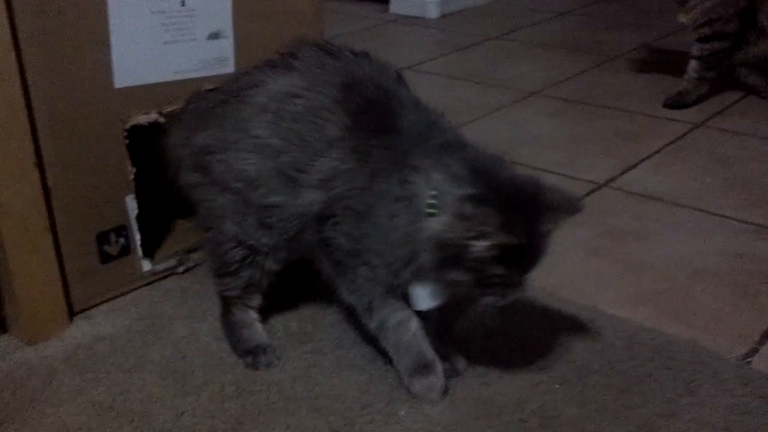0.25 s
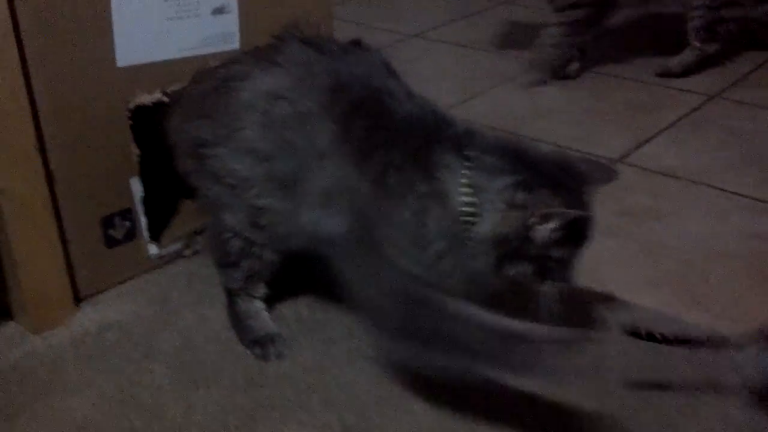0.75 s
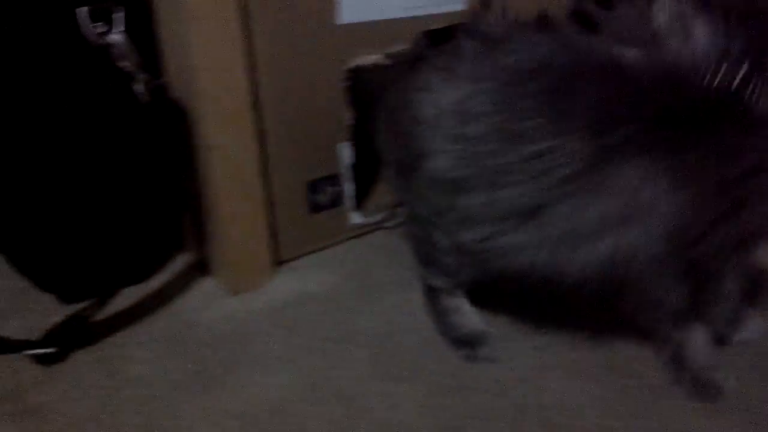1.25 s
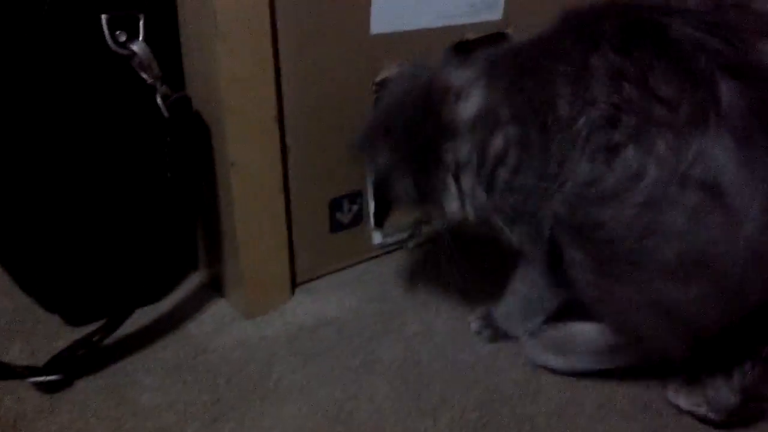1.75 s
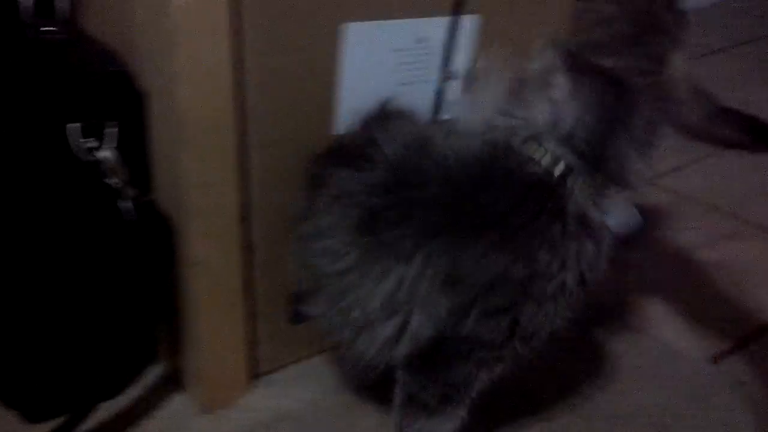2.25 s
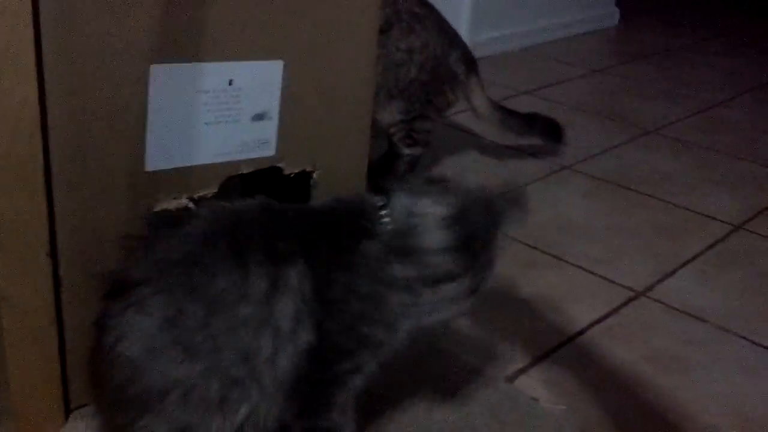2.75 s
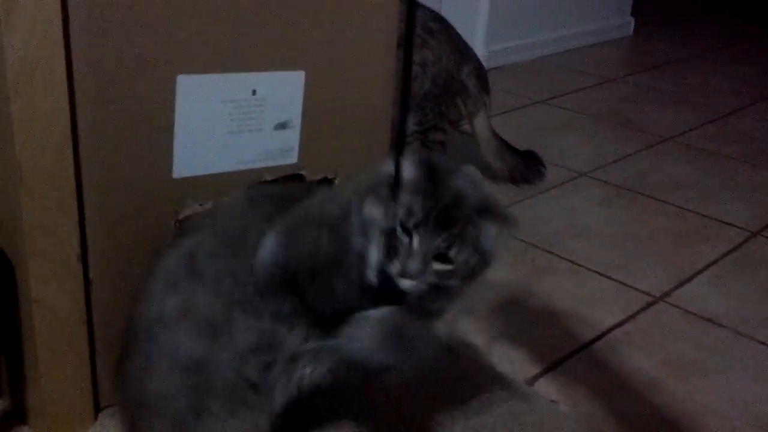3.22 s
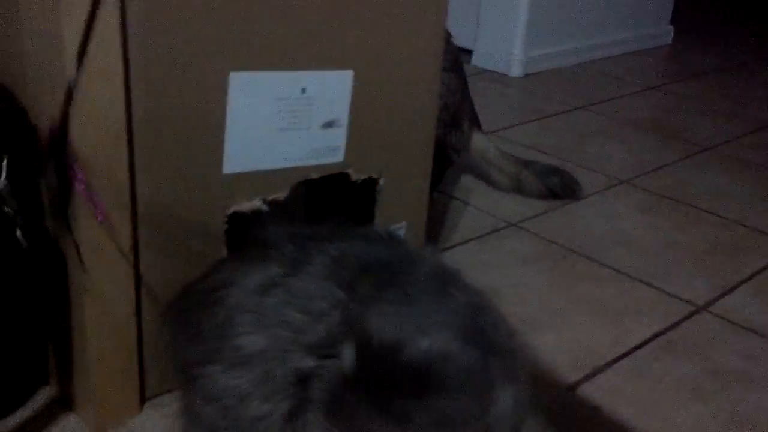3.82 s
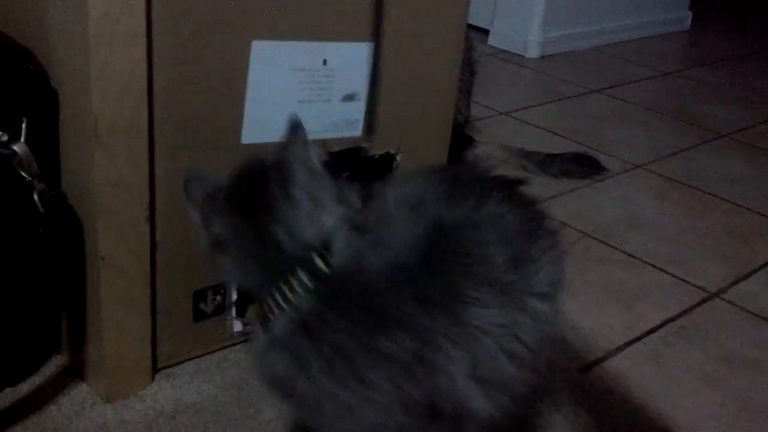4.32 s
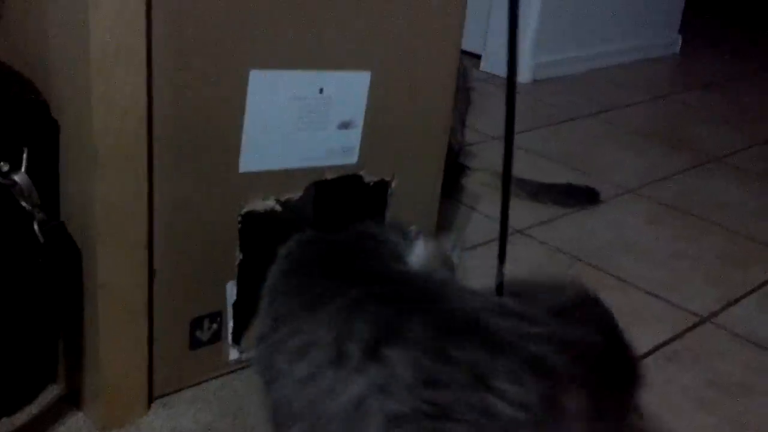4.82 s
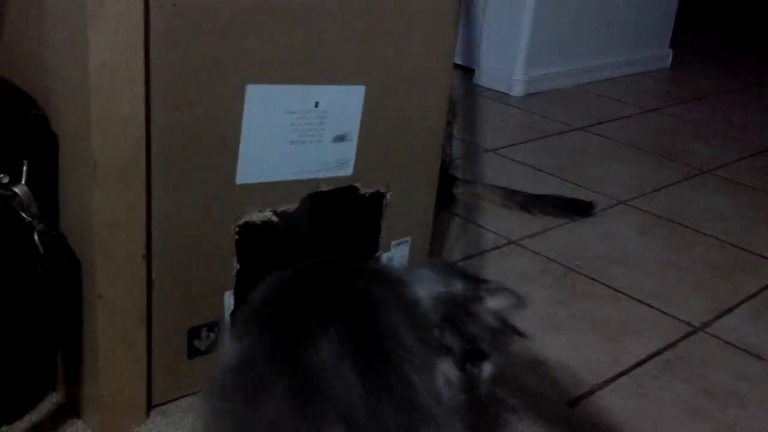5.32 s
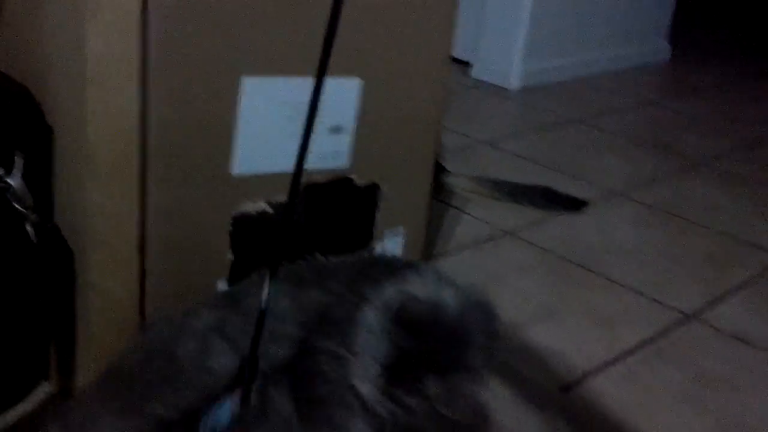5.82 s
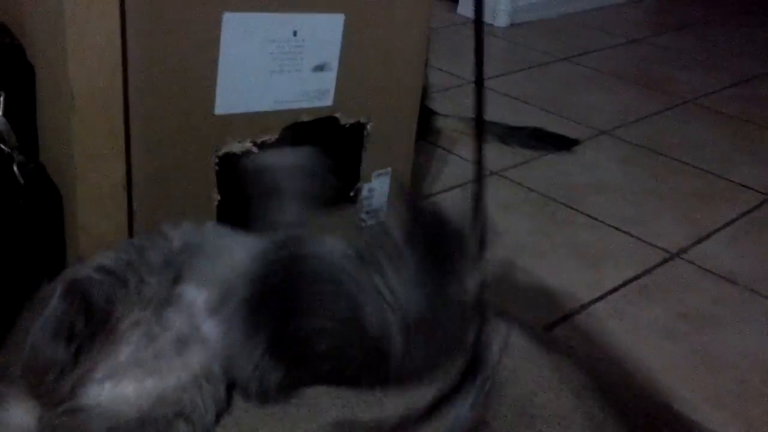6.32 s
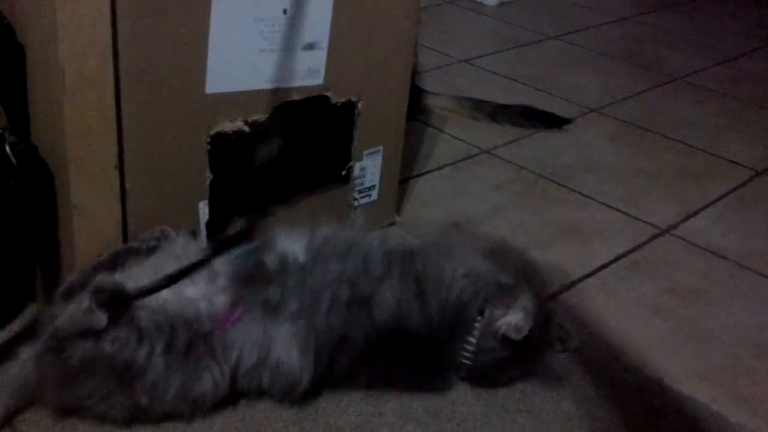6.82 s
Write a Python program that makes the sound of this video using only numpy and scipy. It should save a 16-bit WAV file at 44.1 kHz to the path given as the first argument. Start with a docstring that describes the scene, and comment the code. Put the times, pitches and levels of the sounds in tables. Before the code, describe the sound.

A low, gently wavering ventilation hum fills a small indoor room, heard close in wide stereo. From the start, fur rustles, paws brush softly on carpet and tiny collar pieces give bright, very short clinks. A dry, hard toy snap hits at 0.76 s. Jingling thickens from 0.9 to 2.5 s, with slight metallic scrapes and very faint high chirps between 0.65 and 2.4 s. At 2.3 s a strong, hollow cardboard bump stumbles through several quick blows, crunching and thudding. Clinks continue from 2.8 s, growing dense and brighter around 3.8 to 4.2 s, with lighter box knocks near 3.85 s. It is sparser until a small jingle at 5.2 s. A busy flurry runs from 5.9 to 6.5 s, with a second dry snap at 6.18 s and a soft box bump just after. A few clinks and a light cardboard knock at 6.95 s end it.

```python
"""A low ventilation hum, soft rustling and small bright clinks open the scene: a cat chases a wand toy on carpet.
Its coat and paws are grainy filtered noise; bell, tag, ring and buckle on its collar are fur-damped ringing
modes with noise ticks and scrapes. Faint chirps are narrow noise bands; the toy snaps with a brief tone and crack.
A cardboard box answers bumps with panel modes, crunch, scuff and low thuds.
A camera with two microphone ports widens the stereo and trims the lowest and highest sound."""
import sys
import numpy as np
from scipy import signal
from scipy.fft import rfft, irfft, next_fast_len
from scipy.io import wavfile

SR = 44100
rng = np.random.default_rng(int(sys.argv[2]) if len(sys.argv) > 2 else 0)


def store_wav(level_fs):
    """Save 16-bit WAV to argv[1]."""
    pcm = np.round(np.clip(np.atleast_2d(level_fs), -1, 1) * 32767)
    wavfile.write(sys.argv[1], SR, pcm.T.astype(np.int16))


N = 311346

# Levels in these tables are relative: the layers set their own gains on top.
# steady room air: f/Hz, level density/dB per Hz
AIR_SPECTRUM = [(30, -83), (60, -91), (85, -93.5), (120, -81), (200, -85.5), (270, -75.5), (370, -76),
                (500, -82), (1000, -93), (1450, -99), (2200, -100), (4000, -108), (10000, -111),
                (15500, -107)]
# ventilation duct resonances: f/Hz, width/Hz, level/dB
DUCT_RESONANCES = [(121.2, 2.5, -70), (154.73, 2.55, -62.5), (320, 15, -64), (348.9, 7.8, -60.5)]
# how briskly the cat moves, heard as coat and collar rustle: t/s, level/dB
MOTION = [(0, -62), (0.62, -68), (0.88, -58.5), (1.1, -63), (1.65, -60), (1.86, -69), (2.22, -68.5),
          (2.35, -60), (2.7, -74), (3.28, -58), (3.72, -68.5), (3.95, -70.5), (4.07, -57), (4.15, -67.5),
          (4.35, -73.5), (5.14, -78.5), (5.28, -59), (5.62, -72), (5.9, -69.5), (6.15, -55), (6.4, -64),
          (7.06, -69.5)]
# paws working on the carpet: t/s, level/dB
PAW_TREAD = [(0, -58.5), (0.68, -59), (0.85, -58.5), (1.3, -63), (1.53, -51), (2.1, -58.5), (2.4, -48.5),
             (2.6, -80), (2.83, -57.5), (3.3, -55), (3.65, -63), (3.88, -50), (4.3, -73), (4.5, -54),
             (4.8, -59), (5.7, -59), (6.4, -61.5), (7.06, -56.5)]
# colour of the coat's rustle: f/Hz, level/dB
COAT_SPECTRUM = [(1000, -6), (2500, -4), (4000, 15), (6500, 5.5), (9500, 11.5), (13000, 17), (15500, 11)]
# colour of the paws on carpet: f/Hz, level/dB
PAW_SPECTRUM = [(50, -30), (100, -16), (300, 12), (600, 3.5), (1000, 4), (1500, -8), (2200, -10.5),
                (4000, -113)]
# clear clinks of the collar: t/s, ringing level/dB, contact tick level/dB, piece hit
CLINKS = [(0.055, -52, -55, "ring"), (0.099, -50, -57.5, "ring"), (0.1927, -51, -50.5, "ring"),
          (0.372, -66, -50, "bell"), (0.379, -66, -44.5, "bell"), (0.517, -55.5, -53.5, "bell"),
          (0.8797, -57, -53, "bell"), (0.89, -52.5, -50, "buckle"), (0.9013, -55, -48, "bell"),
          (0.9911, -53.5, -60, "ring"), (1.0904, -45, -44, "buckle"), (1.098, -50, -58, "buckle"),
          (1.21, -49.5, -65, "ring"), (1.317, -46, -60, "rim"), (1.374, -47.5, -50, "ring"),
          (1.514, -57, -62, "bell"), (1.5435, -50, -42.5, "rim"), (1.5563, -49, -55, "ring"),
          (1.574, -53, -50, "ring"), (1.62, -50, -70, "ring"), (1.6743, -43, -51, "ring"),
          (1.6878, -49, -48.5, "ring"), (1.744, -56, -56, "tag"), (1.7728, -49, -46.5, "tag"),
          (1.779, -55, -60, "ring"), (1.916, -49, -46, "tag"), (1.925, -60, -51, "buckle"),
          (1.9614, -49, -46, "ring"), (2.031, -46.5, -48, "ring"), (2.0435, -52, -57, "ring"),
          (2.064, -56.5, -44.5, "buckle"), (2.129, -47, -42.5, "ring"), (2.1323, -56, -51, "ring"),
          (2.2674, -41.5, -39.5, "tag"), (2.269, -45, -43, "tag"), (2.327, -49, -56, "ring"),
          (2.342, -52, -58, "ring"), (2.381, -56, -58, "ring"), (2.473, -53, -63, "ring"),
          (2.664, -60, -52.5, "buckle"), (2.7856, -66, -52.5, "bell"), (2.81, -60, -48.5, "bell"),
          (2.858, -58, -55, "bell"), (2.952, -51, -61, "ring"), (2.959, -43.5, -55, "ring"),
          (3, -66, -53, "tag"), (3.0869, -59, -51, "bell"), (3.1893, -59, -47, "bell"),
          (3.2525, -50.5, -49.5, "ring"), (3.294, -52, -43.5, "tag"), (3.387, -44, -51, "rim"),
          (3.396, -47, -55, "rim"), (3.41, -54, -51, "rim"), (3.4625, -43, -44.5, "ring"),
          (3.548, -44, -54, "rim"), (3.556, -44.5, -48, "bell"), (3.6063, -60, -50.5, "bell"),
          (3.75, -52, -61, "bell"), (3.815, -36.5, -39.5, "rim"), (3.839, -47, -48, "rim"),
          (3.862, -42, -50, "rim"), (3.8923, -48.5, -61, "bell"), (3.97, -55, -69, "ring"),
          (4.014, -50, -44, "rim"), (4.0186, -50, -43, "bell"), (4.0402, -40, -44.5, "rim"),
          (4.111, -63, -58, "bell"), (4.171, -61, -60, "ring"), (4.181, -38.5, -37, "ring"),
          (4.1894, -52, -49, "buckle"), (4.3975, -62, -56, "ring"), (4.4294, -55, -62, "ring"),
          (4.623, -59.5, -62, "tag"), (4.873, -50.5, -53.5, "tag"), (5.211, -57, -47.5, "ring"),
          (5.218, -51.5, -51, "bell"), (5.262, -48, -52, "bell"), (5.268, -44.5, -43, "tag"),
          (5.336, -56, -54, "bell"), (5.4448, -66, -49.5, "tag"), (5.6705, -64, -53.5, "bell"),
          (5.736, -49.5, -57, "bell"), (5.8462, -55, -58, "ring"), (5.9402, -45, -57, "ring"),
          (5.987, -44.5, -44.5, "bell"), (6.0197, -52, -54, "ring"), (6.0383, -46, -37.5, "rim"),
          (6.0437, -48, -46, "ring"), (6.0934, -49, -65, "ring"), (6.115, -55, -52, "tag"),
          (6.125, -49.5, -55, "tag"), (6.2077, -52, -60, "tag"), (6.218, -58, -53, "ring"),
          (6.2315, -55, -50, "bell"), (6.287, -42.5, -47, "ring"), (6.315, -55, -74, "ring"),
          (6.372, -47, -54, "ring"), (6.417, -58, -51, "ring"), (6.495, -53, -58, "ring"),
          (6.51, -55, -61, "ring"), (6.719, -50, -50.5, "bell"), (6.845, -54.5, -59.5, "bell"),
          (6.9366, -51.5, -50, "ring")]
# collar pieces sliding along each other: t/s, length/s, level/dB, piece rubbed
SCRAPES = [(0.383, 0.047, -65, "bell"), (1.563, 0.062, -56, "ring"), (1.684, 0.041, -53.5, "ring"),
           (2.032, 0.028, -55, "ring"), (3.194, 0.043, -58, "bell"), (3.823, 0.03, -45, "rim"),
           (3.971, 0.029, -55.5, "bell"), (4.049, 0.024, -45.5, "rim"), (4.044, 0.06, -59.5, "buckle"),
           (4.092, 0.022, -53.5, "bell"), (5.275, 0.029, -54.5, "tag"), (6.137, 0.026, -48, "ring"),
           (6.21, 0.069, -62, "ring"), (6.235, 0.035, -57, "buckle"), (6.485, 0.035, -58, "buckle"),
           (6.476, 0.055, -51, "ring")]
# how a hit on one piece spreads over the collar, by piece hit:
# bell low-note level/dB, bell high-note level/dB, tag level/dB, ring level/dB, buckle level/dB
COLLAR_SHARES = {"bell": (-6, -5, -21, -9, -20), "rim": (-18.5, -3, -37, -18, -36),
                 "tag": (-22, -20, -1.5, -2, -13), "ring": (-21, -16, -18, -1, -28),
                 "buckle": (-23, -17, -12, -9, -4.5)}
# the bell's low note, modes before detune and fur damping: f/Hz, level/dB, t60/s
BELL_LOW_MODES = [(6290, -11, 0.061), (6850, -8, 0.033), (7277, 3.5, 0.053)]
# the bell's high note, likewise: f/Hz, level/dB, t60/s
BELL_HIGH_MODES = [(14420, -5.5, 0.06), (14950, -6, 0.014), (15450, -5, 0.012)]
# the tag, likewise: f/Hz, level/dB, t60/s
TAG_MODES = [(4685, -15, 0.02), (7950, -3, 0.025), (7960, 2, 0.058)]
# the ring, likewise: f/Hz, level/dB, t60/s
RING_MODES = [(4750, -27.5, 0.027), (11640, -4.5, 0.018), (11800, -1.5, 0.032), (11950, -0.5, 0.04),
              (12220, -14, 0.025), (12920, -5.5, 0.036)]
# the buckle, likewise: f/Hz, level/dB, t60/s
BUCKLE_MODES = [(4090, -8, 0.016), (4470, -3.5, 0.021), (4785, -1.5, 0.036), (5300, -4.5, 0.035),
                (9430, -9, 0.017)]
# shared colour of the contact ticks: f/Hz, level/dB
TICK_SPECTRUM = [(1000, -5), (2500, -10.5), (4500, -8.5), (7000, 0.5), (10000, 1.5), (13000, 1.5),
                 (15500, 5)]
# faint high chirps somewhere in the room: t/s, level/dB, f/Hz
CHIRPS = [(0.655, -57, 5250), (1.043, -58.5, 5300), (1.432, -57, 5450), (1.822, -63, 5160),
          (2.41, -63, 5400)]
# dry snaps of the toy: t/s, level/dB, f/Hz, time to the peak/s, crack level/dB relative to the snap
SNAPS = [(0.7644, -20.5, 956, 0.001, -14.5), (2.2672, -42, 2100, 0.0006, 3),
         (6.1796, -24, 700, 0.0011, -5.5), (6.1812, -41.5, 1076, 0.0028, -29)]
# colour of the toy's crack: f/Hz, level/dB
CRACK_SPECTRUM = [(800, 4.5), (1900, -3.5), (2500, -1), (3300, 3), (4400, -5), (5500, -14), (9000, -32)]
# bumps against the box: t/s, level/dB, first-step hardness f/Hz, weight on the lowest modes level/dB,
# scuff level/dB, share of the free ring time [0-1]
BUMPS = [(1.318, -46, 2220, -12, -53, 0.4), (2.2906, -22.5, 2090, -21, -42, 0.61),
         (2.296, -28.5, 1110, 0, -42.5, 0.97), (2.3156, -30, 1300, -14, -48, 0.82),
         (2.3335, -24.5, 360, -19, -50, 0.855), (2.357, -30, 520, -15, -52, 0.99),
         (2.392, -44.5, 900, -4, -59, 0.94), (2.554, -44.5, 1290, -15, -80, 0.37),
         (3.816, -45, 2000, -9, -43, 0.98), (3.8428, -33.5, 1290, -9, -41, 0.8),
         (3.8485, -31.5, 1000, -11, -48, 0.98), (3.886, -44.5, 1100, -6, -53, 1),
         (6.230, -38.5, 850, -9, -56, 1), (6.9551, -36, 1780, -26, -49.5, 0.39)]
# panel modes of the box, before detune and paw damping: f/Hz, level/dB, t60/s
BOX_MODES = [(79.3, 5, 0.2), (120.7, 2, 0.21), (151.6, 1.5, 0.2), (257, -11, 0.3), (321, -2, 0.15),
             (349.2, -1.5, 0.24), (410, -12, 0.11), (552.3, -6, 0.23), (604, -1.5, 0.15), (705, -5.5, 0.13),
             (817, -5, 0.11), (991, -0.5, 0.11), (1038, -14, 0.16), (1157, -5, 0.19), (1414, -9, 0.14),
             (1690, -14, 0.1), (1750, -5.5, 0.095), (1950, -15.5, 0.092)]
# colour of crunching card: f/Hz, level/dB
CRUNCH_SPECTRUM = [(100, 2), (330, 7), (600, 8.5), (1050, 3), (1400, -8), (1900, 1.5), (2400, -9),
                   (4000, -50)]
# colour of scuffing along card: f/Hz, level/dB
SCUFF_SPECTRUM = [(800, 9.5), (2500, -8), (3500, 5), (3780, 4.5), (4050, 1), (4450, 5), (5000, 1),
                  (8000, 1), (12000, 3.5), (15500, -2)]
# hard blows dent the card, which springs back, and one sets the whole box swinging slowly: t/s, level/dB, f/Hz,
# time to the peak/s
BLOW_SWINGS = [(2.2913, -22.5, 960, 0.0021), (2.2925, -24, 118, 0.009), (2.3322, -25.5, 352, 0.006),
               (2.355, -36, 347, 0.011), (3.8435, -29.5, 960, 0.0027), (3.856, -33.5, 300, 0.006),
               (6.9547, -37, 790, 0.0012)]

ROOM_T60_S = 0.18
CLINK_SIZE = SR // 20  # samples, 50 ms
TICK_RISE_S, TICK_T60_S, TICK_TINT_DB = 0.0006, 0.009, 3.5
GRAZE_DB, CHATTER_DB, REBOUND_DB = -24, -11, -17  # relative to the main clink
BOX_DETUNE = 0.004  # relative spread of mode frequency
PORT_LAG = 16  # samples
TOP_HZ = 15800


def undb(db):
    """Decibels to gain."""
    return 10 ** (np.asarray(db) / 20)


def seconds(length):
    """Time axis of that length in seconds."""
    return np.arange(int(length * SR)) / SR


def add(track, start, sound):
    """Mix a sound into a two-port track from a start time in seconds."""
    i = int(max(start, 0) * SR)
    track[:, i:i + sound.shape[-1]] += sound[..., :max(N - i, 0)]


def colour(x, points):
    """Shape the spectrum by (f/Hz, level/dB) points."""
    hz, db = np.transpose(points)
    size = next_fast_len(x.shape[-1], real=True)
    f = np.fft.rfftfreq(size, 1 / SR)
    gain = undb(np.interp(np.log(f + 1), np.log(hz), db))
    return irfft(rfft(x, size) * gain, size)[..., :x.shape[-1]]


def unit(x):
    """Scale to rms 1."""
    return x / np.sqrt(np.mean(x ** 2))


def noise(size, alike=0):
    """White noise at the two ports; alike is their correlation."""
    mid, side = rng.standard_normal((2, size))
    opposite = side * np.array([[1], [-1]])
    return (np.sqrt(1 + alike) * mid + np.sqrt(1 - alike) * opposite) / np.sqrt(2)


def walk(rate):
    """Random wander with a spread near 1, gliding between new values at this rate per second."""
    knots = rng.standard_normal(1000)
    return np.interp(np.arange(N) / SR * rate, np.arange(len(knots)), knots)


def fade(t, t60):
    """Exponential decay, down 60 dB after t60 seconds."""
    return undb(-60 * t / t60)


def swell(t, peak_s):
    """Smooth rise to 1 and fall again: a soft contact."""
    return (t / peak_s * np.exp(1 - t / peak_s)) ** 3


def soften(x, hz):
    """Second-order low-pass: a soft contact pushes longer."""
    return signal.sosfilt(signal.butter(2, min(hz, SR / 3), fs=SR, output="sos"), x)


def room(x, wet_db, t60):
    """Add room reflections as a decaying noise tail, different at each port."""
    t = seconds(.4)
    tail = noise(len(t)) * fade(t, t60) * (t > .003)
    tail /= np.sqrt(np.sum(tail ** 2, axis=1, keepdims=True))
    return x + undb(wet_db) * signal.fftconvolve(x, tail, axes=1)[:, :N]


def ventilation(waver_db=1.0):
    """Steady room air with narrow duct resonances, wavering gently in level."""
    air = colour(noise(N, alike=0.03), AIR_SPECTRUM) * np.sqrt(SR / 2)
    for hz, width, db in DUCT_RESONANCES:
        peak = signal.iirpeak(hz, hz / width, fs=SR)
        air += undb(db) * unit(signal.lfilter(*peak, noise(N, alike=0.13)))
    return air * undb(waver_db * walk(5.077))


def jolts(lead_s=0.0033, settle_s=0.026, jolt_db=-15.5):
    """Power of the coat's rustle around each clink: the jerk that swings the collar stirs the fur too."""
    t, power = np.arange(N) / SR, np.zeros(N)
    for start, _, tick_db, _ in CLINKS:
        near = slice(*np.searchsorted(t, [start - .1, start + .3]))
        since = t[near] - start
        surge = np.exp(np.minimum(since / lead_s, -since / settle_s))
        power[near] += (undb(tick_db + jolt_db) * surge) ** 2
    return power


def rustle(coat_db, paws_db, grain_db=3.5, coat_gain_db=-1, paws_gain_db=-3, carpet_grain=0.45):
    """Hairs and carpet fibres slip in countless tiny grains of uneven size."""
    # one random level per 64 samples
    grains = np.repeat(undb(grain_db * rng.standard_normal(N // 64 + 1)), 64)[:N]
    coat = unit(colour(noise(N) * grains * undb([[0], [-3]]), COAT_SPECTRUM))
    # the soft pile evens the grains out
    paws = unit(colour(noise(N, alike=0.84) * grains ** carpet_grain, PAW_SPECTRUM))
    return coat * undb(coat_db + coat_gain_db) + paws * undb(paws_db + paws_gain_db)


def glances(clinks, db, gap_s, spread_s):
    """Weaker contacts at other spots, shortly before or after each clink."""
    chance = rng.random(clinks.shape)
    starts = clinks[:, 0] + gap_s + spread_s * chance[:, 0]
    levels = clinks[:, 1:] + db + 10 * (chance[:, 1:] - .5)
    return np.column_stack([starts, levels])


def contacts(motion_db, touch_dbs=(-2, -7, -9, -12, -1, -18), spread_db=3.5, count=180):
    """Clear clinks with grazes, chatter and rebounds, and small touches thicker and louder with motion."""
    # rows of t/s, tick level/dB, then a level/dB for each voice of the collar
    clinks = np.array([(start, tick_db, *(db + np.array(COLLAR_SHARES[piece])))
                       for start, db, tick_db, piece in CLINKS])
    # the pieces graze just before they hit, chatter as they meet, and bounce once more a little later
    grazes = glances(clinks, GRAZE_DB, gap_s=-.003, spread_s=-0.0064)
    chatter = glances(clinks, CHATTER_DB, gap_s=.0015, spread_s=0.0044)
    rebounds = glances(clinks, REBOUND_DB, gap_s=.004, spread_s=.02)
    # brisk motion fills the running total faster, so it draws more touches
    busy = np.cumsum(undb(.5 * motion_db))
    shares = (np.arange(count) + rng.random(count)) / count
    starts = np.searchsorted(busy, busy[-1] * shares)
    scatter = spread_db * rng.standard_normal((count, len(touch_dbs)))
    levels = motion_db[starts, None] + np.array(touch_dbs) + scatter
    touches = np.column_stack([starts / SR, levels])
    return np.vstack([clinks, grazes, chatter, rebounds, touches])


def tick(count=8):
    """Contact noise with a colour of its own: every spot on the metal favours other bands."""
    tint_db = TICK_TINT_DB * rng.standard_normal(count)
    tint = np.column_stack([np.geomspace(3000, 16000, count), tint_db])
    return unit(colour(noise(CLINK_SIZE), tint))


def strike(modes, scatter_db=6.0, detune=0.0041, far_port_db=-5, fur_db=1.5):
    """One blow on metal: the contact point changes mode shares and tuning, the fur their length."""
    hz, db, t60 = np.transpose(modes)[:, :, None]
    size, tune, side = rng.standard_normal((3, len(modes), 1))
    t60 = t60 * undb(fur_db * rng.uniform(-1.5, 1))
    share = undb(db + scatter_db * size)
    # the scatter moves strength between modes but keeps their total
    share *= np.linalg.norm(undb(db)) / np.linalg.norm(share)
    pole = np.exp((2j * np.pi * hz * (1 + detune * tune) - np.log(1000) / t60) / SR)
    waves = share * np.cumprod(np.repeat(pole, CLINK_SIZE, axis=1), axis=1)
    near = waves.imag.sum(0)
    # the far port is shadowed and hears each mode a quarter cycle early or late
    far = undb(far_port_db) * (np.sign(side) * waves.real).sum(0)
    return np.array([near, far])


def jingle(piece_dbs):
    """The bell's two notes, the tag, the ring and the buckle, struck together at these levels."""
    pieces = (BELL_LOW_MODES, BELL_HIGH_MODES, TAG_MODES, RING_MODES, BUCKLE_MODES)
    return sum(undb(db) * strike(modes) for db, modes in zip(piece_dbs, pieces))


def scrapes(catch_db=8):
    """Sliding metal catches and slips many times, which keeps the pieces buzzing."""
    out = np.zeros((2, N))
    for start, length, db, piece in SCRAPES:
        size = int(length * SR)
        push, catch = rng.standard_normal((2, size))
        friction = push * undb(catch_db * catch) * np.hanning(size)
        buzz = signal.fftconvolve(friction[None], jingle(COLLAR_SHARES[piece]), axes=1)
        add(out, start, undb(db) * buzz / np.std(buzz[:, :size]))
    return out


def collar(motion_db, tick_db=14.3, ring_db=10.5, far_port_db=-3):
    """Metal slides onto metal: a short tick, then the pieces ring."""
    ticks, rings = np.zeros((2, 2, N))
    t = np.arange(CLINK_SIZE) / SR
    contact = 1 - np.exp(-t / TICK_RISE_S)
    tick_shape = contact * fade(t, TICK_T60_S) * undb([[0], [far_port_db]])
    for start, tick_level, *piece_levels in contacts(motion_db):
        add(ticks, start, undb(tick_level) * tick_shape * tick())
        add(rings, start, contact * jingle(piece_levels))
    metal = undb(tick_db) * colour(ticks, TICK_SPECTRUM) + undb(ring_db) * rings + scrapes()
    return room(metal, wet_db=-7.5, t60=ROOM_T60_S)


def chirps(peak_s=0.014, width=0.055, ring_t60=0.22):
    """Short narrow noise bands swell and fall as chirps, blurred by the room."""
    out, t = np.zeros((2, N)), seconds(0.11)
    for start, db, hz in CHIRPS:
        band = [(hz * (1 - width) ** 2, -40), (hz * (1 - width), -9), (hz, 0),
                (hz * (1 + width), -9), (hz * (1 + width) ** 3, -32)]
        chirp = unit(colour(noise(len(t), alike=-0.4), band))
        add(out, start, undb(db) * chirp * swell(t, peak_s))
    return room(out, wet_db=-0.5, t60=ring_t60)


def toy(crack_t60=0.009):
    """The toy snaps with a few dead cycles and a crack."""
    snaps, t = np.zeros((2, N)), seconds(0.037)
    for start, db, hz, peak_s, crack_db in SNAPS:
        body = np.sin(2 * np.pi * hz * t) * swell(t, peak_s)
        crack = unit(colour(noise(len(t)), CRACK_SPECTRUM)) * fade(t, crack_t60)
        add(snaps, start, undb(db) * (undb(crack_db) * crack - body))
    return room(snaps, wet_db=-10.0, t60=0.05)


def judder(gap_s=0.00506, gap_growth=1.68, loss_db=-4, softening=0.85, count=3):
    """Card gives way in steps, later, weaker and softer: rows of delay/s, level/dB, share of hardness."""
    return [(gap_s * np.sum(gap_growth ** np.arange(k)), k * loss_db, softening ** k) for k in range(count)]


def box_panels(t, weight_db, free, body_db=-10, port_spread=0.41):
    """The card panels drum in decaying modes; body weight moves the whole box."""
    hz, db, t60 = np.transpose(BOX_MODES)[:, :, None]
    # every spot answers with a slightly different tuning
    tune, skew = rng.standard_normal((2, len(BOX_MODES), 1))
    level = undb(db + body_db + weight_db * (hz < 200))
    waves = level * fade(t, t60 * free) * np.exp(2j * np.pi * hz * (1 + BOX_DETUNE * tune) * t)
    # the wide panels reach the two ports out of step
    return np.array([(waves * np.exp(1j * side * port_spread * skew)).imag.sum(0) for side in (1, -1)])


def box(crunch_db=-8, crunch_t60=0.087, scuff_t60=0.19):
    """Bumps drum the panels, crunch and scuff the card; a paw that stays on it cuts the ring short."""
    out, t = np.zeros((2, N)), seconds(0.25)
    for start, level_db, hard_hz, weight_db, scuff_db, free in BUMPS:
        for delay, step_db, softer in judder():
            panels = box_panels(t, weight_db, free)
            crunch = unit(colour(noise(len(t), alike=0.9), CRUNCH_SPECTRUM)) * fade(t, crunch_t60 * free)
            blow = soften(panels + undb(crunch_db) * crunch, hard_hz * softer)
            add(out, start + delay * free, undb(level_db + step_db) * blow)
        scuff = unit(colour(noise(len(t)), SCUFF_SPECTRUM)) * fade(t, scuff_t60 * free)
        add(out, start, undb(scuff_db) * scuff)
    # a small box radiates little deep bass
    radiation = [(45, -32), (70, -7), (110, 1.5), (180, 3.0), (250, -2.5), (350, 0.0)]
    return room(colour(out, radiation), wet_db=-6.5, t60=ROOM_T60_S)


def thuds(thud_hz=108, peak_s=0.0076, thud_db=-7.5):
    """The cat's weight swings the whole box for a few slow cycles; hard blows dent the card as well, and one
    sets the box swinging."""
    out, t = np.zeros((2, N)), seconds(.1)
    for start, level_db, _, weight_db, *_ in BUMPS:
        thud = swell(t, peak_s) * np.sin(2 * np.pi * thud_hz * t)
        add(out, start, undb(level_db + weight_db + thud_db) * thud)
    for start, db, hz, swing_s in BLOW_SWINGS:
        add(out, start, undb(db) * swell(t, swing_s) * np.sin(2 * np.pi * hz * t))
    return out


def scene(fidget_db=2.5, step_db=3.0):
    """Everything as it reaches the two ports; the cat's movement comes in small uneven surges."""
    t = np.arange(N) / SR
    motion_db = np.interp(t, *np.transpose(MOTION)) + fidget_db * walk(12)
    paws_db = np.interp(t, *np.transpose(PAW_TREAD)) + step_db * walk(8)
    coat_db = 10 * np.log10(undb(motion_db) ** 2 + jolts())
    cat = rustle(coat_db, paws_db) + collar(motion_db)
    return ventilation() + cat + chirps() + toy() + box() + thuds()


def record(dry, cross_db=1.0, balance_db=-0.6, low_cut_hz=75):
    """The camera subtracts each port, delayed, from the other to widen; it cuts the rumble and the top."""
    other = np.pad(dry[::-1], ((0, 0), (PORT_LAG, 0)))[:, :N]
    cross = [(60, -5), (130, -10), (400, -63.0), (750, -5.5), (1300, cross_db), (16000, cross_db)]
    wide = dry - colour(other, cross)
    wide = wide * undb(np.array([[balance_db], [-balance_db]]) / 2)
    wide = signal.sosfilt(signal.butter(2, low_cut_hz, "high", fs=SR, output="sos"), wide)
    return signal.sosfilt(signal.ellip(10, .2, 80, TOP_HZ, fs=SR, output="sos"), wide)


dry = scene()
out = record(dry)
store_wav(out)
```